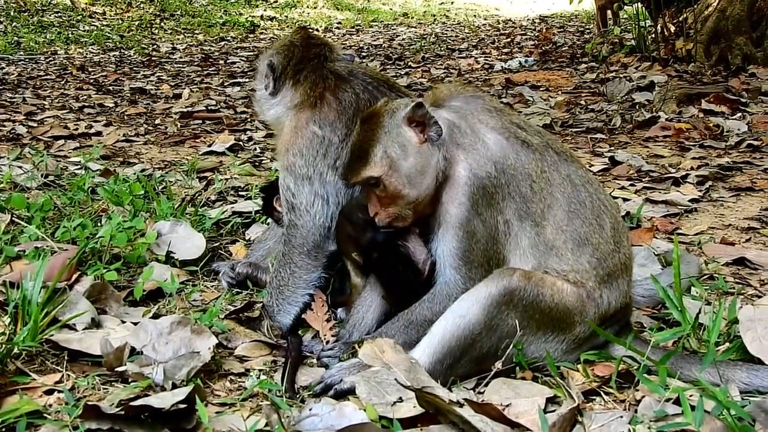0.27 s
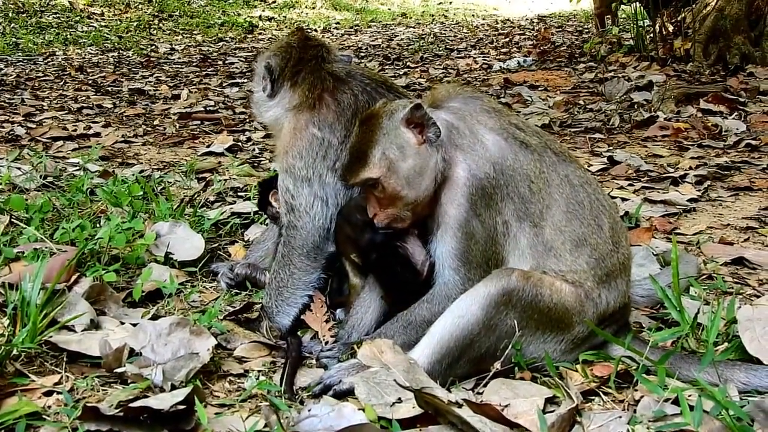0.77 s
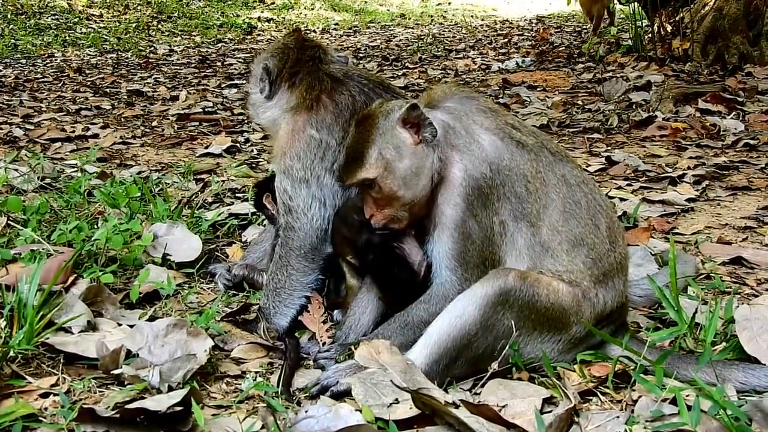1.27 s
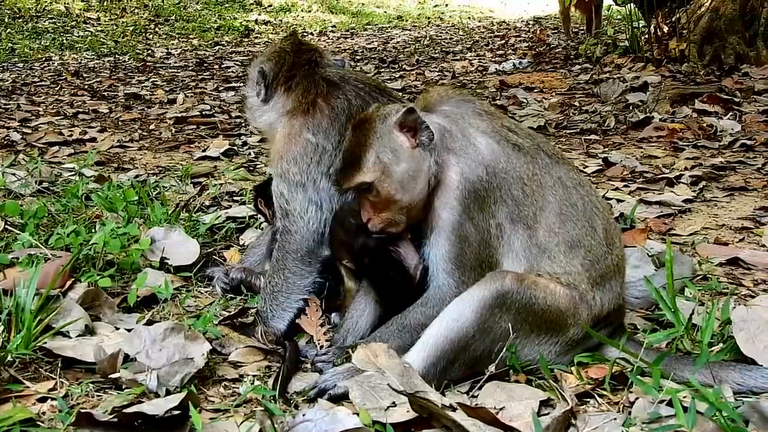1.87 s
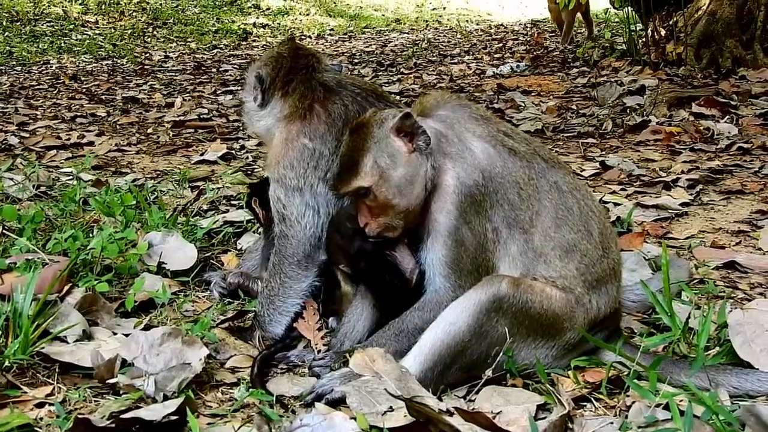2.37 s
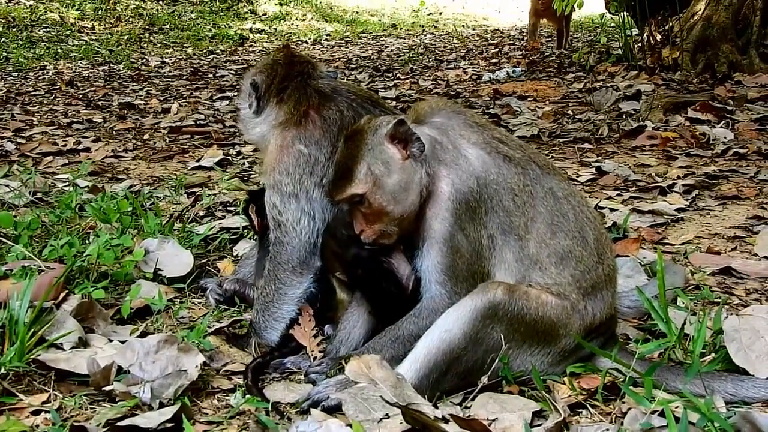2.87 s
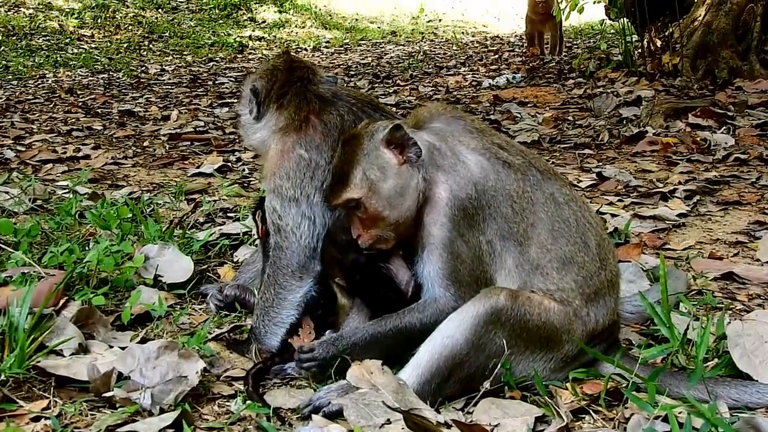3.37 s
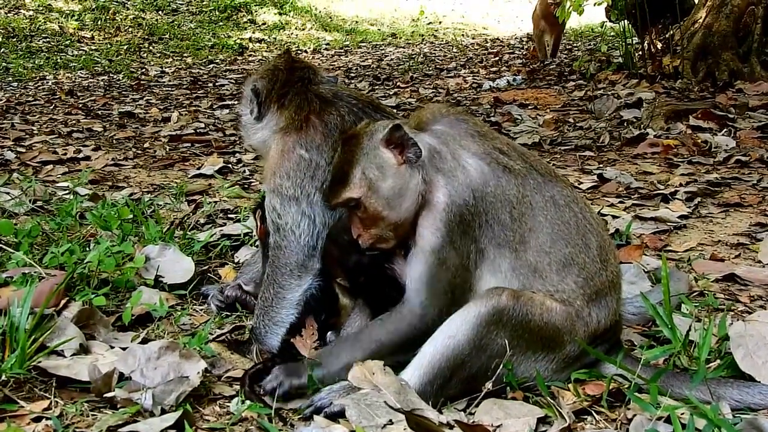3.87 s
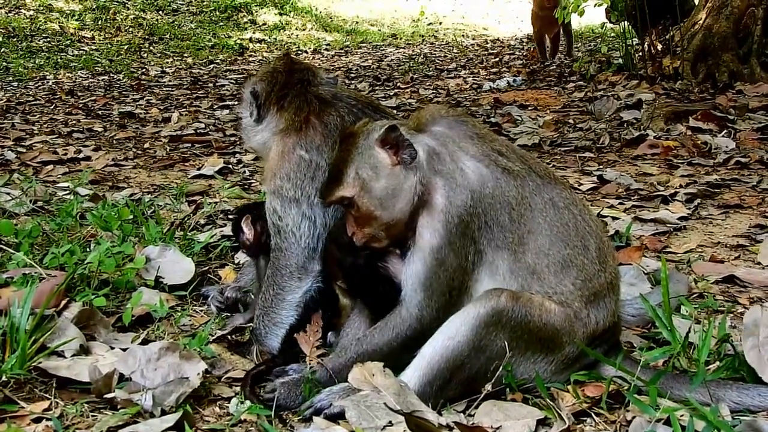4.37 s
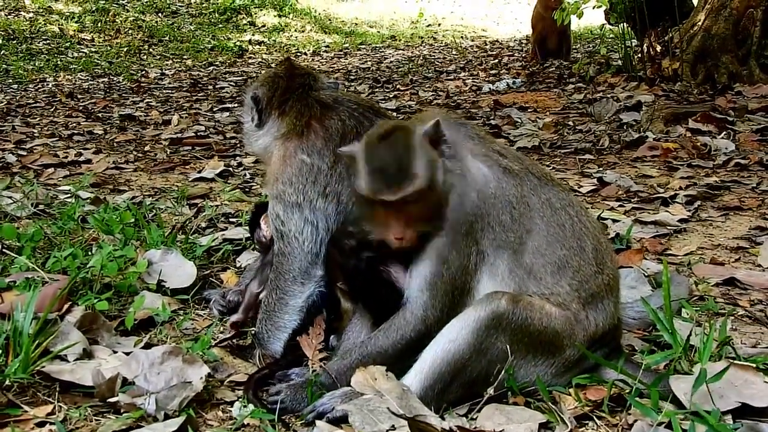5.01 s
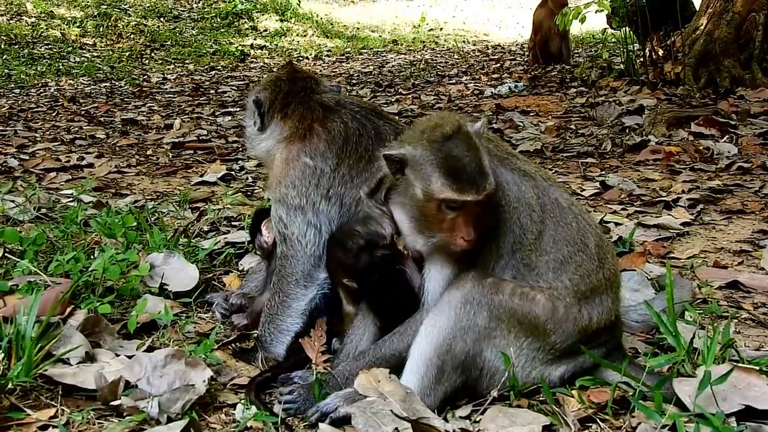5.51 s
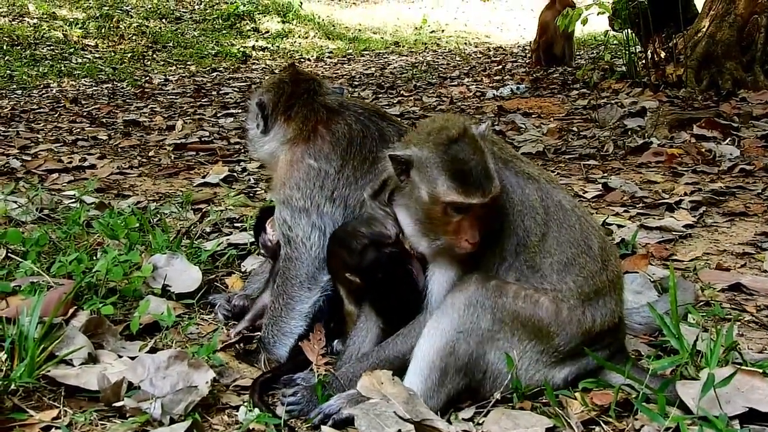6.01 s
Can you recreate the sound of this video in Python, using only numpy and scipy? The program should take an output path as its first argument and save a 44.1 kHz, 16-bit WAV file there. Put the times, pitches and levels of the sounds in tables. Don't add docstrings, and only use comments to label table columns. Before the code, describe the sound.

Outdoors in a wood, a massed cicada hiss runs throughout over soft, throbbing traffic rumble from beyond the trees. A thin cricket line sits left. A distant bird gives five quick rising chirps in the first second, with short pips from another on the right. Faint leaf ticks come near the microphone at about one and nearly four seconds; two nearer chirps close the scene.

```python
import sys
import numpy as np
from scipy import signal
from scipy.fft import rfft, irfft, next_fast_len
from scipy.io import wavfile
from scipy.ndimage import map_coordinates

SR = 44100
rng = np.random.default_rng(int(sys.argv[2]) if len(sys.argv) > 2 else 0)


def master(y):
    cut = np.clip(np.atleast_2d(y).T, -1, 1)
    pcm = np.round(cut * 32767)
    wavfile.write(sys.argv[1], SR, pcm.astype(np.int16))


def voltage_ratio(level):
    return 10 ** (np.asarray(level, float) / 20)


N = 275625


def along(points, hz):
    f, v = np.transpose(points)
    return np.interp(np.log(hz + 1), np.log(f + 1), v)


def curves(rows):
    s, *cols = np.transpose(rows)
    return [np.interp(np.arange(N) / SR, s, c) for c in cols]


def wobble(rate):
    knots = rng.standard_normal(int(N * rate / SR) + 4)
    return map_coordinates(knots, [np.arange(N) * rate / SR])


def filtered(x, response):
    m = next_fast_len(N + SR // 2)
    return irfft(rfft(x, m) * response(np.fft.rfftfreq(m, 1 / SR)), m)[..., :N]


def spread(pair, colour):
    # pitch_hz, likeness [0-1]
    alike = [(30, .6), (50, .75), (80, .9), (150, .97), (300, .98), (500, .97), (1000, .91), (2000, .84),
             (3600, .83), (4200, .68), (4750, .78), (5300, .52), (6200, .3), (6900, .15), (8000, .38),
             (10000, .3)]
    # pitch_hz, lead_rad
    lead = [(4300, 0), (5900, -.4), (6700, -.8), (7400, -2), (8600, -2.8), (10000, -3), (12000, -1.6)]
    # pitch_hz, left_over_right_db
    lean = [(60, 0.5), (500, 1.5), (1000, 2), (1800, 0.5), (3000, 2.5), (3600, 2.5), (5000, 1.5),
            (6600, -1.5), (7600, 1), (9000, 1.2)]

    def turn(hz):
        return np.arccos(np.clip(along(alike, hz), 0, 1)) / 2

    def port(hz):
        return voltage_ratio(along(lean, hz) / 2) * np.exp(.5j * along(lead, hz))

    mid, side = filtered(pair, lambda hz: colour(hz) * [np.cos(turn(hz)), np.sin(turn(hz))])
    ports = np.array([mid + side, mid - side])
    field = filtered(ports, lambda hz: np.array([port(hz), 1 / port(hz)]))
    return field / np.std(field.mean(axis=0))


def clicks(rate_hz, count):
    beats = rate_hz * (1 + .12 * rng.standard_normal((2 * count, 1)))
    unevenness = 1 + .25 * rng.standard_normal((2 * count, int(2 * rate_hz * N / SR)))
    steps = unevenness * SR / beats
    at = np.cumsum(steps, axis=1) - SR / beats * rng.random((2 * count, 1))
    at = np.clip(at.astype(int), 0, N)
    at = at + (N + 1) * (np.arange(2 * count)[:, None] % 2)
    crowd = np.bincount(at.ravel(), rng.standard_normal(at.size), 2 * N + 2)
    return crowd.reshape(2, -1)[:, :N]


def cicadas():
    # time_s, level_db
    fervour = [(0, .8), (.5, -.5), (.85, 1.5), (1.3, -.8), (1.6, -1), (2.4, 0), (2.9, 0), (3.5, .6),
               (4.7, .3), (5.8, .5), (6.25, 0)]
    # pitch_hz, width_hz, level_db
    tymbal = [(1773, 344, -7.5), (3458, 672, 0)]
    # pitch_hz, density_db [per Hz]
    shrill = [(3400, -44), (4050, -6), (4630, -6.5), (5350, 0), (6000, -1), (6810, 1), (7640, -3),
              (8100, -8), (8850, -16.5), (9100, -22.5), (10500, -30), (12000, -38), (15000, -57),
              (16000, -60)]

    def body(f):
        return sum(voltage_ratio(db) * (1j * f * w / (c * c - f * f + 1j * f * w)) ** 2 for c, w, db in tymbal)

    fervour_db = curves(fervour)[0]
    low = spread(clicks(rate_hz=200, count=120), body)
    high = spread(clicks(rate_hz=260, count=300), lambda hz: voltage_ratio(along(shrill, hz)))
    low_db = -45 + fervour_db + .7 * wobble(4) + .7 * wobble(9)
    high_db = -41.6 + 0.22 * fervour_db + 0.43 * wobble(5.48)
    return voltage_ratio(low_db) * low + voltage_ratio(high_db) * high


def engine(rate, effort, pipe, centre, flutter_db):
    turn = 2 * np.pi * np.cumsum(curves(rate)[0]) / SR
    level_db, tilt_db = curves(effort)
    total = 0
    for order, db in pipe:
        strength = voltage_ratio(db + tilt_db * (order - centre) + flutter_db * wobble(2.442))
        total = total + strength * np.sin(round(order) * turn + 0.32 * wobble(3.5))
    return np.sqrt(2) * voltage_ratio(level_db) * total


def road():
    # time_s, level_db
    load = [(0, 0), (.8, -0.5), (1.1, 1.5), (1.8, 1.5), (2.4, 1), (2.9, -1.5), (3.6, 1), (4.2, 0.5),
            (4.7, -2), (5.1, 0), (5.45, -4.5), (6.25, -3)]
    # time_s, level_db
    pull = [(0, -46.5), (.8, -47), (1.05, -44), (2.3, -46), (3.0, -49), (3.6, -44.5), (4.1, -48),
            (4.6, -50), (5.15, -47.5), (6.25, -49.5)]
    # time_s, level_db
    tyres = [(0, .3), (.6, 0), (1.6, 1.5), (2.4, -0.8), (3.7, 1), (4.3, 1), (4.9, -1), (6.25, -2.5)]
    # pitch_hz, density_db [per Hz]
    rumble_hue = [(13, -57), (22, -33), (60, -8.5), (89, -4), (114, -2), (172, -4.5), (200, -8), (250, -26),
                  (300, -66)]
    wash_hue = [(330, -13.5), (380, -8), (445, 1), (520, -3), (720, -8.5), (1100, -8), (1300, -11.5),
                (2400, -14), (2900, -18), (4200, -13), (5000, -33)]
    growl_hue = [(150, -50), (185, -6.5), (210, -0.5), (250, -2), (300, -4), (367, -15), (400, -16),
                 (500, -60)]
    # time_s, rate_hz
    truck_rate = [(0, 26.22), (.5, 26.16), (1.2, 25.92), (1.9, 26.04), (6.25, 27.62)]
    van_rate = [(0, 18.34), (2.1, 18.3), (3.2, 18.48), (4.2, 18.51), (6.25, 18.82)]
    bike_rate = [(0, 124.2), (.4, 122), (1.25, 109.3), (2.6, 101.7)]
    idle_rate = [(0, 79.45), (6.25, 78.5)]
    # time_s, level_db, tilt_db [per order]
    truck = [(0, -46, -1.7), (1, -48, 0), (2.2, -46.5, -0.28), (3.5, -45, -0.15), (4, -50, -0.51),
             (4.6, -48.5, 0.13), (5.3, -51.5, -2), (5.7, -47.5, -1.3), (6.25, -56.5, 0)]
    van = [(0, -76, .5), (2.6, -54, .8), (3.5, -57, .5), (4, -44.5, .3), (4.5, -54, .3), (5, -50, 0),
           (6.25, -49.5, 0)]
    bike = [(0, -49, 0), (.6, -52, 0), (1.05, -43.5, 0), (1.6, -48.5, 0), (2.05, -45.5, 0), (2.5, -77, 0)]
    idle = [(0, -55, 0), (.27, -43, 0), (.55, -47, 0), (1.0, -57, 0), (5.3, -76, 0), (6.05, -46, 0),
            (6.25, -58, 0)]
    # order [multiple of the rate], level_db
    truck_pipe = [(2, -12), (3, -6), (4, 0), (5, 0.5), (6, -0.5), (7, -5.5), (8, -13), (9, -15)]
    van_pipe = [(4, -7), (5, 1), (6, -3), (7, -2), (8, -10.5), (9, -17.5), (10, -12.5)]
    bike_pipe = [(1, 0.5), (2, -10)]
    idle_pipe = [(1, 0)]

    load_db, effort_db = curves(load)[0], curves(pull)[0]
    mean_db = effort_db.mean()
    swing_db = effort_db - mean_db
    rumble = spread(rng.standard_normal((2, N)), lambda hz: voltage_ratio(along(rumble_hue, hz)))
    wash = spread(rng.standard_normal((2, N)),
                  lambda hz: voltage_ratio(along(wash_hue, hz)) * (hz > 250) * (hz < 6000))
    growl = spread(rng.standard_normal((2, N)), lambda hz: voltage_ratio(along(growl_hue, hz)))
    tones = engine(truck_rate, truck, truck_pipe, 3.9, flutter_db=2.0)
    tones = tones + engine(van_rate, van, van_pipe, 9.3, flutter_db=6.0)
    tones = tones + engine(bike_rate, bike, bike_pipe, 1, flutter_db=2.5)
    tones = tones + engine(idle_rate, idle, idle_pipe, 1, flutter_db=3.5)
    rumble_db = -41.5 + load_db + 1.1 * wobble(3.54)
    wash_db = -51 + curves(tyres)[0] + .1 * swing_db
    growl_db = mean_db - 1.5 + 1.26 * swing_db + .6 * wobble(7.1)
    traffic = voltage_ratio(rumble_db) * rumble + voltage_ratio(growl_db) * growl + voltage_ratio(wash_db) * wash
    return traffic + tones * voltage_ratio([[.8], [-.8]])


def cricket():
    # time_s, level_db
    loudness = [(0, -62.5), (1.2, -62.5), (1.9, -65)]
    hz = 7629 + 5 * wobble(12)
    level_db = curves(loudness)[0] + 2.5 * wobble(15)
    tone = voltage_ratio(level_db) * np.sin(2 * np.pi * np.cumsum(hz) / SR)
    return np.array([1.6 * tone, .7 * np.roll(tone, -2)])


def whistle(hz, size):
    return np.sqrt(2) * size * np.sin(2 * np.pi * np.cumsum(hz) / SR)


def chirps(calls):
    break_depths_db = [13, 10, 8]
    break_hz, register_hz, break_width_hz = 4990, 660, 78
    steady_share = .38
    t, song = np.arange(N) / SR, np.zeros(N)
    quaver_hz = 30 * wobble(220)
    for end, length, db, unsung in calls:
        u = np.clip(1 + (t - end) / length, 0, 1)
        hz = 4350 + 2850 * (steady_share * u + (1 - steady_share) * u ** 3.2)
        hz = hz + 40 * np.sin(2 * np.pi * (hz - break_hz) / register_hz)
        loss_db = .027 * np.clip(4800 - hz, 0, None)
        for k, depth_db in enumerate(break_depths_db):
            off_break = (hz - break_hz - k * register_hz) / break_width_hz
            loss_db = loss_db + depth_db * np.exp(-off_break ** 2 / 2)
        rise = (t - end + length * (1 - unsung)) / .014
        fall = (end + .01 - t) / .008
        gate = np.clip(np.minimum(rise, fall), 0, 1) ** 2
        song += whistle(hz + quaver_hz, gate * voltage_ratio(db - loss_db))
    return song


def notes():
    # start_s, length_s, pitch_hz, peak_db
    pips = [
        (.44, .026, 5670, -42),
        (.456, .019, 5620, -37),
        (.49, .022, 5450, -39),
        (3.624, .024, 5620, -41),
        (3.657, .015, 5640, -41.5),
        (3.678, .018, 5610, -42.5),
    ]
    t, song = np.arange(N) / SR, np.zeros(N)
    for s, length, hz, db in pips:
        u = np.clip((t - s) / length, 0, 1)
        sagging_hz = hz - 1500 * length * (u - .5)
        song += whistle(sagging_hz, voltage_ratio(db) * np.sin(np.pi * u) ** 2)
    return song


def trunks(x, t60):
    t = np.arange(SR // 3) / SR
    tail = rng.standard_normal((3, len(t))) * voltage_ratio(-60 * t / t60)
    tail = tail[0] + 0.32 * tail[1:]
    return signal.fftconvolve(x, tail / np.linalg.norm(tail[0]), axes=1)[:, :N]


def birds():
    # end_s, length_s, level_db, unsung [share of the sweep missing at its start]
    calls = [
        (.1, .13, -41.5, .22),
        (.352, .132, -42, .23),
        (.584, .094, -40.5, .2),
        (.833, .13, -41.5, .31),
        (1.065, .1, -41.5, .28),
        (6.005, .152, -39, 0),
        (6.311, .194, -39, .03),
    ]
    far, near = chirps(calls[:5]), chirps(calls[5:])
    far = far * voltage_ratio(2.2 * wobble(200))
    near = near * voltage_ratio(1.8 * wobble(180))
    foliage = [(4750, 1.5), (5200, .5), (6000, -3.5), (6700, -6), (7200, -15)]  # pitch_hz, level_db
    far = filtered(far, lambda hz: voltage_ratio(along(foliage, hz)))
    aside = notes()
    aside = np.array([np.roll(aside, 2) * voltage_ratio(.5), aside * voltage_ratio(2.5)])
    ahead = (far + near) * voltage_ratio([[.7], [-.7]])
    echoes = voltage_ratio(-5) * trunks(far[None], t60=.12)
    echoes = echoes + voltage_ratio(-8) * trunks(far[None], t60=.4)
    echoes = echoes + voltage_ratio(-8) * trunks(near[None], t60=.25)
    echoes = echoes + voltage_ratio(-9) * trunks(aside, t60=.25)
    return ahead + aside + echoes


def leaf():
    # start_s, pitch_hz, peak_db
    ticks = [
        (1.129, 1950, -37),
        (3.7, 1400, -38),
    ]
    out, t = np.zeros(N + SR), np.arange(SR // 20) / SR
    for s, hz, db in ticks:
        out[round(s * SR):][:len(t)] += voltage_ratio(db - 60 * t / 0.0087) * np.sin(2 * np.pi * hz * t)
    return out[:N]


def scene():
    return cicadas() + road() + cricket() + birds() + leaf()


def roll_off(x):
    return signal.sosfilt(signal.butter(12, 15700, fs=SR, output="sos"), x)


def record(dry):
    # pitch_hz, share [0-1]
    echo = [(3200, 0.07), (3500, 0.33), (3730, 0.67), (3830, 0.83), (3930, 0.53), (4010, 0.77),
            (4060, 0.14)]
    notch_hz, spacing_hz = 3924, 96.5

    def comb(hz):
        late = np.exp(-2j * np.pi * (hz - notch_hz) / spacing_hz)
        return 1 - along(echo, hz) * (hz > 3000) * late

    return roll_off(filtered(dry, comb))


dry = scene()
out = record(dry)
master(out)
```